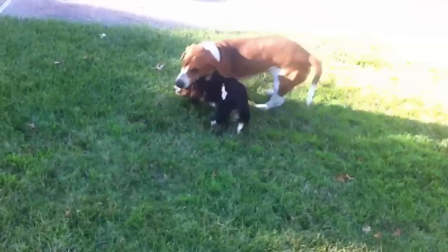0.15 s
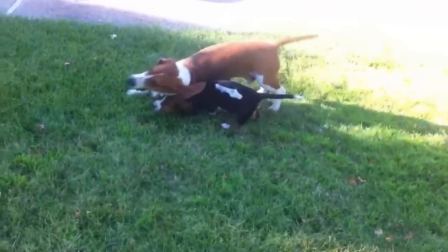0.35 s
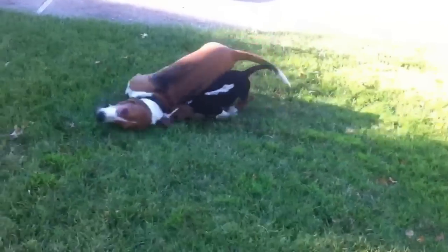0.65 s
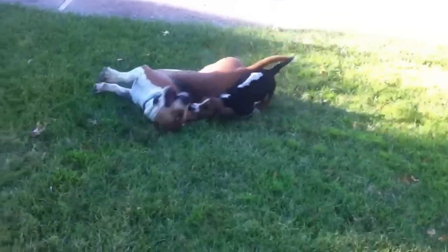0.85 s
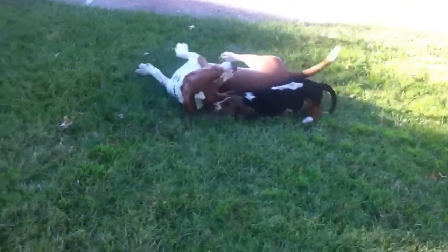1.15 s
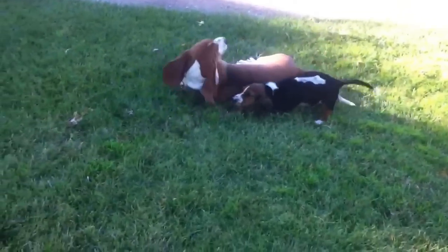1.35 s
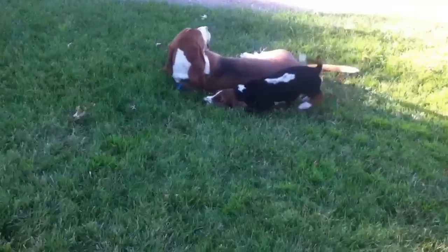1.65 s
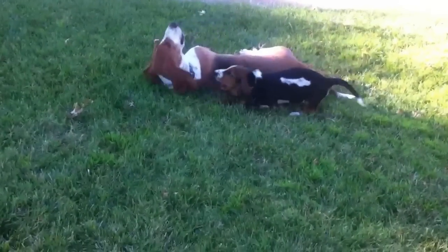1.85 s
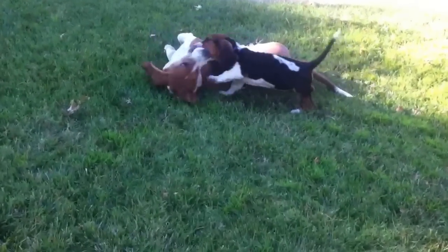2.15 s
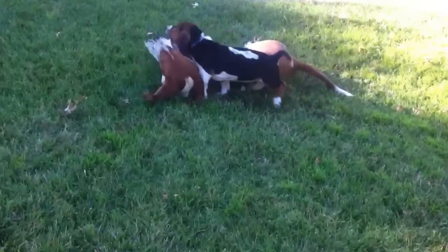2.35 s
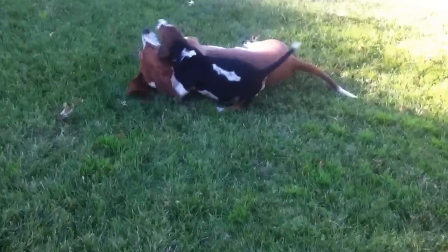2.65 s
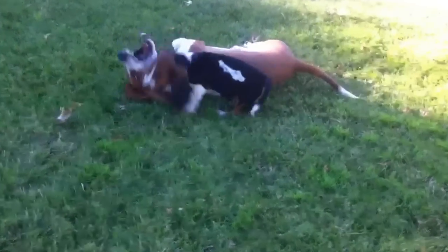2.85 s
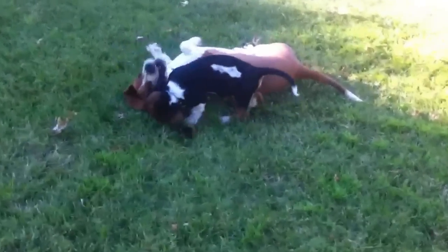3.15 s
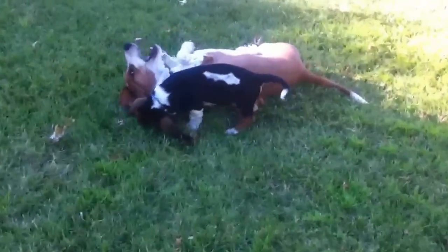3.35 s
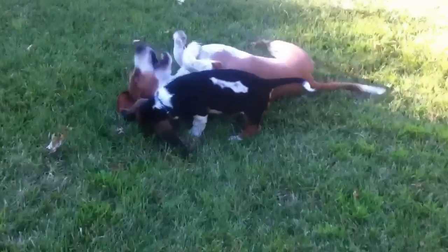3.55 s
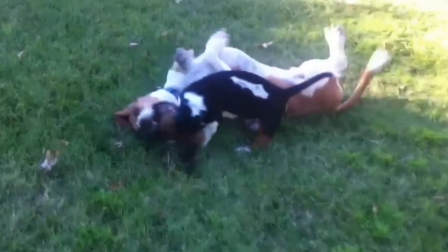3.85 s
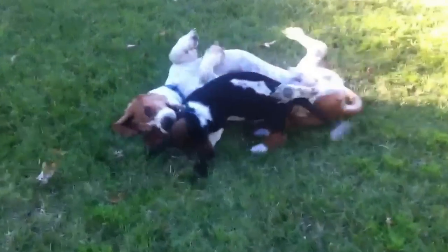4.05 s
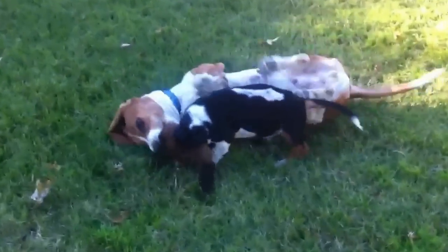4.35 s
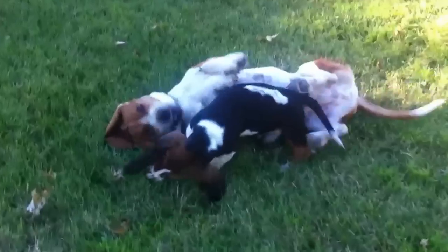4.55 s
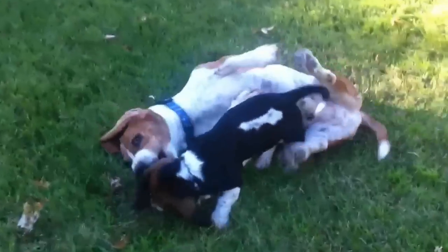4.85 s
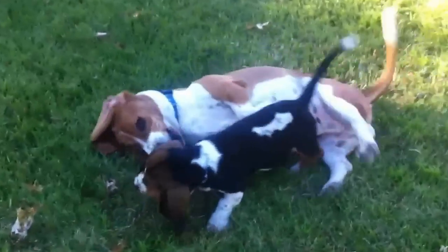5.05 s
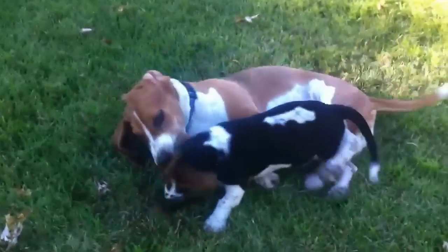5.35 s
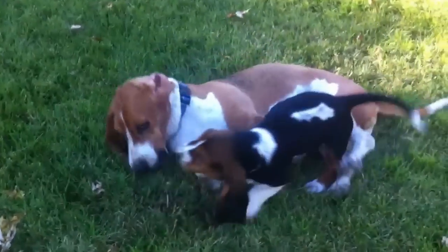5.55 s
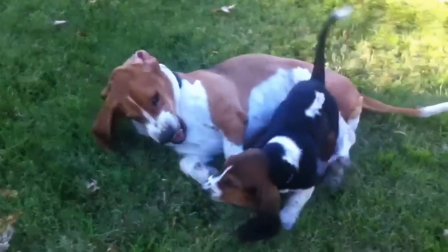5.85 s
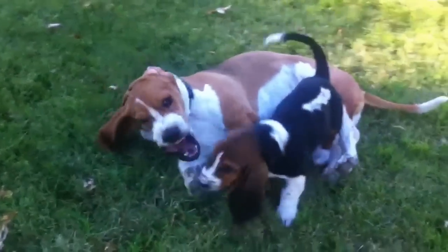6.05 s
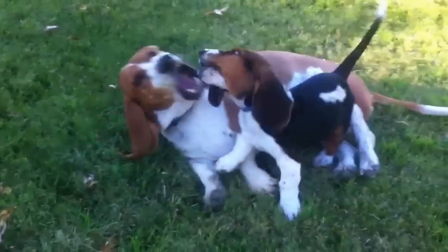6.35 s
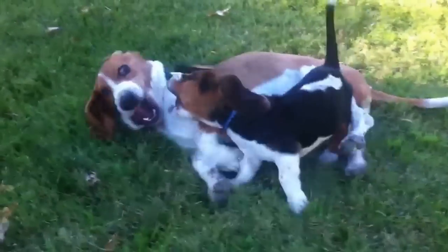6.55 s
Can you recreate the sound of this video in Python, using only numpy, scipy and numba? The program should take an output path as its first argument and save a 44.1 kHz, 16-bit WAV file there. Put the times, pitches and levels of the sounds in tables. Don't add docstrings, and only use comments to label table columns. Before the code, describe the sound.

Low raspy puppy growls come in quick clusters amid grass rubbing, teeth clacks, small crackles, soft huffs and faint outdoor air.

```python
import sys
import numpy as np
from scipy import signal
from scipy.fft import rfft, irfft
from scipy.io import wavfile
from scipy.ndimage import uniform_filter1d
from numba import njit

SR = 44100
rng = np.random.default_rng(int(sys.argv[2]) if len(sys.argv) > 2 else 0)


def amplitude_ratio(level_db):
    exponent = np.asarray(level_db, float) / 20
    return 10 ** exponent


def wrap_up_sound(samples):
    columns = np.atleast_2d(samples).T
    tamed = np.clip(columns, -1, 1)
    steps = np.round(tamed * 32767).astype(np.int16)
    wavfile.write(sys.argv[1], SR, steps)


N = 295029

# f/Hz, level per Hz/dB
AIR_COLOUR = [(15, -24), (25, 17), (49, -2.5), (126, 4.5), (194, 6.5), (402, -3.5), (788, -1.5),
              (2080, -15.5), (3120, -14), (4000, -18.5), (4900, -8.5), (5790, -10.5), (7180, -17),
              (9410, -6.5), (11700, -20.5), (14100, -17.5), (15700, -43)]
# t/s, peak level/dB, f/Hz, time to fall 60 dB/s
THUDS = [(0.545, -51, 149, 0.12), (2.419, -43.5, 118, 0.051), (3.245, -40, 117, 0.14),
         (3.746, -51, 111, 0.14), (3.781, -49, 150, 0.29), (3.822, -42, 140, 0.089),
         (3.86, -39, 142, 0.081), (3.989, -51, 102, 0.12), (4.389, -43, 120, 0.038),
         (5.159, -51.5, 112, 0.12), (5.857, -59, 126, 0.12)]
# centre t/s, spread/s, blade hiss level/dB, fur drag over hiss/dB
ROLLS = [(0.0, 0.0071, -46, 5.5), (.17, 0.15, -59.5, 8), (.285, 0.036, -51, -14), (.565, 0.21, -55.5, 0.5),
         (.9, 0.095, -58, 5.5), (1.2, 0.16, -63, 5), (1.46, 0.17, -61.5, 3.5), (1.69, 0.045, -63, -24),
         (1.9, 0.27, -64.5, 4), (2.41, 0.16, -59, 9), (2.68, 0.2, -60.5, -7), (2.871, 0.056, -57, 7),
         (3.03, 0.1, -54, 2.5), (3.25, 0.06, -58, -0.5), (3.48, 0.1, -63.5, 7), (3.72, 0.067, -63, -17),
         (3.91, 0.14, -52.5, 5), (4.09, 0.12, -57.5, 1.5), (4.34, 0.047, -56, -1.5),
         (4.519, 0.028, -54.5, 4), (4.65, 0.098, -52.5, 6.5), (4.88, 0.12, -52.5, 2.5),
         (5.16, 0.057, -55, 2.5), (5.28, 0.061, -51.5, 3.5), (5.639, 0.34, -53.5, 3),
         (5.853, 0.086, -51.5, 0), (6.211, 0.078, -49, 4.5), (6.42, 0.11, -49, -2), (6.56, 0.21, -65.5, 15),
         (6.69, 0.12, -50.5, 1.5)]
# f/Hz, level per Hz/dB
GRASS_COLOUR = [(1530, 4), (2600, -12.5), (3210, 1), (3540, 3.5), (3990, 2.5), (5430, 1), (6220, 3),
                (7250, -2), (8100, -1), (9340, 4.5), (10600, 1.5), (11700, -1), (13000, 1.5), (14900, -1),
                (15700, -36)]
# t/s, peak level/dB, ring f/Hz, low part over peak/dB
SNAPS = [(0.0353, -29.5, 9800, -17), (0.066, -26.5, 11000, -22), (0.6968, -40, 10300, -13),
         (0.8741, -31.5, 9000, -8.5), (1.5363, -40, 5000, -19), (1.803, -30.5, 9800, -16),
         (2.9615, -39, 9500, 0), (2.9774, -37, 12500, -15), (2.9972, -24.5, 12600, -38),
         (3.016, -35, 9610, -27), (3.036, -30, 9900, -33), (3.08, -39, 9780, -25),
         (3.4865, -39.5, 12000, -9), (3.5578, -32.5, 10200, -47), (3.584, -37, 12100, -18),
         (3.61, -36.5, 8740, -4), (3.6763, -35, 10700, -10), (3.7454, -47, 9700, -12),
         (3.7682, -27.5, 13800, -11.5), (4.0087, -35.5, 6740, -15), (4.5156, -43, 4200, -9),
         (4.526, -35, 3380, 2), (4.547, -43, 3600, -10), (4.578, -48, 3980, -9), (5.126, -42, 9300, -18),
         (5.921, -32.5, 11100, -28), (5.9498, -33, 14700, -22), (5.97, -36, 14200, -27),
         (6.094, -39.5, 7520, -11), (6.0977, -36, 14200, -22), (6.2492, -30, 12700, -14),
         (6.3455, -32, 9210, -1), (6.4726, -40, 12900, -19), (6.586, -31, 5500, -4)]
# t/s, peak level/dB
PINGS = [
    (0.3174, -49),
    (0.6978, -59),
    (1.6736, -61),
    (1.804, -30.5),
]
# f/Hz, level/dB, time to fall 60 dB/s
TAG_MODES = [
    (8980, -11, 0.075),
    (10200, 4.5, 0.092),
    (11700, -24, 0.064),
    (15100, -23, 0.099),
]
# t/s, peak level/dB, mouth f/Hz, time to fall 60 dB/s, share of bare tooth knock/1
CLACKS = [(0.062, -40, 1600, .01, 0.65), (0.004, -24, 1070, 0.021, 0.16), (0.419, -48, 640, 0.07, 0.27),
          (.329, -43, 2220, 0.011, 0.23), (.425, -41, 2170, .012, 0.17), (0.9245, -26.5, 630, 0.022, 0.52),
          (1.199, -46, 1376, 0.12, 0.46), (3.367, -38, 950, 0.02, 0.51), (3.957, -36.5, 1926, 0.082, 0.31),
          (3.989, -38, 1810, 0.026, 0.65), (4.108, -29.5, 1056, 0.023, 0.74),
          (5.357, -42, 1500, 0.019, 0.78), (6.003, -40.5, 660, 0.0091, 0.28),
          (6.086, -41.5, 965, 0.05, 0.75), (6.494, -38.5, 830, 0.066, 0.35),
          (6.523, -31.5, 916, 0.034, 0.12), (6.532, -33, 900, 0.036, .1), (6.585, -24, 1000, 0.025, 0.11),
          (6.621, -26, 1150, 0.026, 0.093), (6.631, -25, 1100, 0.019, 0.37),
          (6.684, -33, 1000, 0.024, 0.24)]
# t/s, length/s, level/dB, snout f/Hz
HUFFS = [
    (.272, .046, -52, 800),
    (.465, 0.087, -60, 680),
    (1.16, 0.024, -52.5, 815),
    (5.585, 0.067, -51, 520),
    (5.64, 0.059, -48.5, 580),
]
# t/s, length/s, level/dB, nostril f/Hz
SNIFFS = [
    (.255, 0.065, -59.5, 5150),
    (1.968, 0.067, -63.5, 5260),
    (2.198, 0.031, -56.5, 5000),
    (2.54, 0.058, -63.5, 5370),
    (5.44, 0.045, -58, 5340),
]
# t/s, length/s,
# level/dB, ringing f/Hz
PANTS = [(5.445, 0.04, -65, 2060), (6.5, .06, -63, 3300), (5.79, 0.1, -68, 1720), (2.2, 0.054, -72, 1900),
         (4.19, 0.027, -61.5, 270), (1.96, 0.074, -66, 2420), (1.3, 0.06, -67, 2150),
         (4.955, 0.058, -58, 1360), (5.6, 0.13, -62.5, 1880), (2.9, 0.039, -53, 1150),
         (5.07, 0.1, -60.5, 1220), (5.19, 0.11, -57, 1900), (4.6, 0.071, -60, 1240)]
# t/s, length/s, chest level/dB, rise in effort from middle to end/dB
GROWLS = [(0.0, 0.031, -48.5, -1.5), (0.062, 0.048, -48.5, 3.5), (0.119, 0.18, -55, -3),
          (0.284, 0.12, -50, 1.5), (.670, 0.11, -48.5, 3), (0.798, 0.13, -49, -0.5),
          (0.934, 0.067, -50.5, 6), (1.403, 0.13, -51.5, 2.5), (1.528, 0.043, -62.5, 5),
          (1.961, 0.072, -47.5, 9), (2.05, 0.19, -59.5, -5), (2.233, 0.066, -57, 1.5),
          (2.315, 0.1, -51, 6.5), (2.429, 0.065, -52.5, -3), (2.914, 0.058, -53.5, 5),
          (2.975, 0.049, -48, 3.5), (3.051, 0.133, -51.5, -1.5), (3.199, 0.165, -49.5, 5),
          (3.371, 0.15, -50, -2.5), (4.509, 0.11, -47.5, 7.5), (4.633, 0.062, -47.5, -0.5),
          (4.705, 0.089, -44, -0.5), (4.804, 0.024, -45.5, -2.5), (4.841, 0.14, -45, 0.5),
          (4.986, 0.042, -65.5, -1), (5.454, 0.045, -43, -1), (5.516, 0.053, -51, -4),
          (6.457, 0.14, -50, 8), (6.581, 0.061, -47.5, 6.5), (6.647, .05, -49, 2)]
SLAP_RATES = [66, 93, 80, 89.5, 90.5, 86, 77, 71.5, 72, 81, 67, 65, 76, 83, 80, 79, 77, 74, 85, 72, 81, 84,
              79, 84, 90, 88, 82, 80, 80, 81]
# mouth f at start/Hz, at end/Hz, mouth over chest/dB, mouth width/Hz
JAWS = [(1100, 490, -3.5, 210), (1510, 1300, -8.5, 330), (1600, 1000, -8.5, 350), (838, 680, 0.5, 110),
        (790, 700, 7.5, 420), (825, 420, 2.5, 350), (760, 560, -5.5, 710), (950, 750, -4.5, 130),
        (775, 610, 10.5, 140), (990, 940, -1.5, 160), (950, 1300, -6, 190), (1320, 1700, -1.5, 160),
        (786, 500, 2.5, 240), (950, 1570, 2, 240), (1150, 1600, -6, 220), (1180, 1200, -5, 100),
        (1060, 1060, -10, 160), (930, 370, -16, 510), (1140, 1200, -1.5, 160), (1000, 810, -35, 250),
        (1160, 1130, -7, 230), (1160, 1100, -8, 120), (1150, 1200, -4, 140), (1110, 700, 1, 234),
        (1600, 780, 14.5, 270), (950, 1340, -10, 200), (1190, 1400, -4.5, 100), (840, 1300, -20, 300),
        (990, 990, -2, 250), (1030, 610, -13, 230)]
# roughness/1, throat f/Hz, throat over chest/dB, nose over chest/dB
THROATS = [(0.34, 560, -25, -14), (0.42, 565, -8, -12), (0.45, 584, -6, -2), (0.19, 635, -7.5, -19),
           (0.25, 740, -13, 4), (0.3, 640, -5, -10), (0.36, 620, -6, 5), (0.29, 630, -5, -3),
           (0.43, 600, -16, -2), (0.24, 630, -3, -18), (0.22, 536, -8.5, -23), (0.37, 730, -3, 8),
           (0.26, 520, -13, -9), (0.28, 670, 1.5, -12), (0.31, 680, -6, 6), (0.19, 570, -10, -6),
           (0.16, 670, -15, -25), (.29, 330, -16, -3), (0.33, 753, -5.5, 6.5), (0.33, 760, -40, -25),
           (0.2, 690, -10, 1), (.27, 744, -11.5, 4.5), (0.07, 700, -9, -15), (0.2, 715, -5.5, 9),
           (0.5, 620, 0, 6), (.26, 480, -12, -13), (0.27, 470, -13, -20), (0.35, 420, -8, -14),
           (0.31, 414, -3.5, 11), (0.35, 444, -6, -22)]
# mid-cycle slap share/1, nose f/Hz, chest f/Hz
VOICES = [(0.8, 2400, 244), (0.39, 2370, 250), (0.7, 2630, 224), (0.16, 2200, 226), (0.35, 2200, 228),
          (0.65, 2660, 222), (1, 2380, 220), (0.16, 2300, 178), (0.77, 2700, 170), (0.25, 2400, 188),
          (0.2, 2160, 200), (0.17, 2100, 214), (0.28, 2000, 185), (0.42, 2200, 210), (0.48, 1800, 194),
          (0.33, 1500, 160), (0.52, 2100, 202), (0.97, 1750, 190), (0.43, 2110, 193), (0.15, 1930, 158),
          (0.21, 2100, 217), (0.34, 2220, 176), (0.27, 2600, 200), (0.3, 1490, 205), (0.71, 2200, 180),
          (0.33, 2250, 198), (0.21, 2300, 190), (0.69, 2000, 140), (0.51, 2190, 163), (0.61, 2400, 150)]
# t/s, gain/dB
LIP_MOVES = [(.064, -2), (.085, 4.5), (.094, 14), (.11, -12), (.143, 15.5), (.17, 12), (.213, 9), (.236, 6),
             (.262, 2), (.29, -11), (.678, -3), (.733, 2), (.773, -4), (.785, -2), (.815, 4), (.868, -8),
             (.918, 3.5), (1.43, 5), (1.506, 3.5), (1.964, -5), (1.985, 4.5), (2.015, 1), (2.24, 7),
             (2.36, 4), (2.445, 0), (2.481, 4), (3.005, 8), (3.15, 11), (3.172, 8), (3.265, 0), (.333, 4.5),
             (1.465, 4), (3.374, 6.5), (3.415, 2), (3.472, -3), (3.455, 4), (4.635, 5), (4.65, -5),
             (4.741, 10.5), (4.757, -2), (4.862, 5), (4.88, -7), (4.892, 4), (4.927, -3), (4.942, 6.5),
             (4.964, -5), (4.976, 2), (4.845, -2.5), (5.525, -5), (5.56, 2), (5.585, 4), (2.41, -4)]

GROWL_RELEASE_S = 0.014
MUFFLE_DB = 4


@njit
def svf(x, hz, width):
    y, b, l = np.empty(len(x)), 0., 0.
    for i in range(len(x)):
        g, k = np.tan(np.pi * hz[i] / SR), width[i] / hz[i]
        v = (b + g * (x[i] - l)) / (1 + g * (g + k))
        b, l, y[i] = 2 * v - b, l + 2 * g * v, k * v
    return y


def unit(x):
    return x / np.sqrt(np.mean(x ** 2))


def band(x, hz, width_hz, order=2):
    hz = np.clip(hz, 40, .45 * SR) + np.zeros(len(x))
    width = width_hz + np.zeros(len(x))
    for _ in range(order):
        x = svf(x, hz, width)
    return unit(x)


def smooth_filter(x, order, hz, kind="low"):
    return signal.sosfiltfilt(signal.butter(order, hz, kind, fs=SR, output="sos"), x)


def colour(x, spectrum):
    hz, db = np.transpose(spectrum)
    bins = np.arange(len(x) // 2 + 1) * SR / len(x)
    bins = np.clip(bins, 1, hz[-2])
    gain = amplitude_ratio(np.interp(np.log(bins), np.log(hz), db))
    return unit(irfft(rfft(x) * gain, len(x)))


def walk(rate):
    k = int(SR / rate)
    steps = np.repeat(rng.standard_normal(N // k + 1), k)
    return 0.92 * uniform_filter1d(steps, k)[:N]


def swell(start, length, attack_s, release_s):
    first = int(start * SR)
    t = np.arange(min(int((length + 5 * release_s) * SR), N - first)) / SR
    head_start = attack_s * (start == 0)
    rise = np.minimum((t + head_start) / attack_s, 1)
    fall = np.exp(-np.maximum(t - length, 0) / release_s)
    return slice(first, first + len(t)), rise * fall


def ring(hz, t60, rise_s):
    t = np.arange(int(min(t60, .3) * SR) + 8) / SR
    x = np.sin(2 * np.pi * hz * t) * (1 - np.exp(-t / rise_s)) * 1000. ** (-t / t60)
    return x / np.abs(x).max()


def add(out, s, x):
    i = max(int(s * SR), 0)
    out[i:i + len(x)] += x[:N - i]


def garden():
    air = colour(rng.standard_normal(N), AIR_COLOUR)
    traffic = smooth_filter(air, 2, 600)
    leaves = air - traffic
    traffic_gain = amplitude_ratio(1.6 * walk(6) + 0.5 * walk(20))
    leaves_gain = amplitude_ratio(0.74 * walk(3.47) + 2.0 * walk(19))
    return amplitude_ratio(-60) * (traffic * traffic_gain + leaves * leaves_gain)


def thuds():
    out = np.zeros(N)
    for s, db, hz, t60 in THUDS:
        add(out, s, amplitude_ratio(db) * ring(hz, t60, rise_s=0.0036))
    return out


def rolls():
    centre, spread, db, fur_db = np.transpose(ROLLS)[:, :, None]
    t = np.arange(0, N + 64, 64) / SR
    hiss_db = db - 6 * np.abs((t - centre) / spread) ** 1.42
    scrape_db = hiss_db - 6 + 0.65 * fur_db
    drag_db = hiss_db + fur_db - 10.0
    gains = []
    for layer_db in (hiss_db, scrape_db, drag_db):
        total = np.sqrt(np.sum(amplitude_ratio(layer_db) ** 2, axis=0))
        gains.append(np.interp(np.arange(N) / SR, t, total))
    return gains


def crackle(per_s, spread_db, bed):
    size = amplitude_ratio(spread_db * np.minimum(rng.exponential(size=N), 3))
    ticks = (rng.random(N) < per_s / SR) * size * rng.standard_normal(N)
    return unit(ticks) + bed * rng.standard_normal(N)


def lawn():
    hiss_gain, scrape_gain, drag_gain = rolls()
    ticks = crackle(per_s=1500., spread_db=4.0, bed=2.05)
    ticks = ticks * amplitude_ratio(2.1 * walk(45) + .6 * walk(14))
    grass = colour(ticks, GRASS_COLOUR)
    stalks = smooth_filter(grass, 4, 7500)
    blades = grass - stalks
    upper_shift, lower_shift = 1 + .07 * walk(14), 1 + .12 * walk(10)
    upper_fur = band(ticks, 1950 * upper_shift, 1160)
    lower_fur = band(ticks, 1200 * lower_shift, 1250)
    fur = unit(upper_fur + .5 * lower_fur)
    fur = fur + 0.067 * band(ticks, 590, 1300)
    return hiss_gain * unit(blades) + scrape_gain * unit(stalks) + drag_gain * fur


def snaps():
    out = np.zeros(N)
    for s, db, hz, low_db in SNAPS:
        burst = rng.standard_normal(128) * np.exp(-np.arange(128) / 33.0)
        bright = band(burst, hz, hz ** 2 / 11000, order=1)
        crack = bright + amplitude_ratio(low_db) * band(burst, 2270, 2100)
        add(out, s, amplitude_ratio(db) * crack / np.abs(crack).max())
    return out


def tag_pings():
    out = np.zeros(N)
    for s, db in PINGS:
        for hz, mode_db, t60 in TAG_MODES:
            add(out, s, amplitude_ratio(db + mode_db) * ring(hz, t60, rise_s=0.00045))
            add(out, s, amplitude_ratio(db + mode_db - 18.0) * ring(hz + 135.0, t60, rise_s=.0002))
    return out


def clacks():
    out = np.zeros(N)
    for s, db, hz, t60, tooth in CLACKS:
        rise_s = 0.00021 + 0.0021 * max(1 - 2 * tooth, 0)
        add(out, s, amplitude_ratio(db - 8.5) * ring(hz, t60, rise_s))
        burst = rng.standard_normal(400) * np.exp(-np.arange(400) / 60.)
        knock = band(burst, 1210, 1360, order=3)
        add(out, s, amplitude_ratio(db) * tooth * knock / np.abs(knock).max())
    return out


def breath(calls, width_hz, flutter_db):
    out = np.zeros(N)
    air = rng.standard_normal(N) * amplitude_ratio(flutter_db * walk(70))
    for start, length, db, hz in calls:
        span, shape = swell(start, length, attack_s=.04, release_s=.025)
        snout = band(air[span], hz, width_hz, order=3)
        snout = snout + .5 * band(air[span], 1.246 * hz, width_hz, order=3)
        out[span] += amplitude_ratio(db) * shape * snout
    return out


def older_dog():
    out = breath(HUFFS, width_hz=330, flutter_db=2.0)
    out = out + breath(SNIFFS, width_hz=1900, flutter_db=4.0)
    return out + breath(PANTS, width_hz=380, flutter_db=3.0)


def lips():
    s, db = np.transpose(LIP_MOVES)[:, :, None]
    t = np.arange(0, N + 64, 64) / SR
    gain_db = np.sum(db * np.exp(-.5 * ((t - s) / .006) ** 2), axis=0)
    return amplitude_ratio(np.interp(np.arange(N) / SR, t, gain_db))


def folds(rate, rough, half):
    chance = np.clip(rng.standard_normal((200, 4)), -1.8, 1.8)
    air = rng.standard_normal(SR // 2)[:len(rate)]
    turns = np.cumsum(rate) / SR
    cycle = np.arange(len(chance))
    slaps = np.zeros(len(rate))
    for offset, size, when, loud in ((.1, 1, 0, 1), (.6, -half, 2, 3)):
        time_spread = (.15 + .5 * (offset - .1)) * rough
        loud_spread_db = (6 + 14 * (offset - .1)) * rough
        at = cycle + offset + time_spread * chance[:, when]
        keep = (at > 0) & (at < turns[-1])
        slaps[np.searchsorted(turns, at[keep])] += size * amplitude_ratio(loud_spread_db * chance[keep, loud])
    leak = air * np.exp(-((turns - .1) % 1) / .4)
    leak = .6 * rough * unit(leak)
    thumps = unit(np.abs(slaps) ** .7) + leak
    return unit(slaps) + .4 * leak, thumps


def mouth_ring(slaps, first_hz, pitch_hz, width_hz):
    soft = signal.sosfilt(signal.butter(4, 2500, fs=SR, output="sos"), slaps)
    mouth = band(soft, pitch_hz, 1.3 * width_hz)
    front = band(soft, first_hz, 1130, order=3)
    teeth = band(slaps, 2320, 300, order=3)
    return mouth + amplitude_ratio(-12.5) * front + amplitude_ratio(-26) * teeth


def puppy():
    chest, head = np.zeros(N), np.zeros(N)
    wavering, muffling = 1 + .055 * walk(80), walk(28)
    for growl, rate, jaw, throat, voice in zip(GROWLS, SLAP_RATES, JAWS, THROATS, VOICES):
        start, length, middle_db, rise_db = growl
        first_hz, last_hz, mouth_db, width_hz = jaw
        rough, throat_hz, throat_db, nose_db = throat
        half, nose_hz, chest_hz = voice
        span, chest_shape = swell(start, length, 0.0049, GROWL_RELEASE_S)
        head_shape = swell(start, length, .002, GROWL_RELEASE_S)[1]
        after_end = np.maximum(np.arange(len(head_shape)) / SR - length, 0)
        head_shape = head_shape * np.exp(-after_end / 0.018)

        along, waver = np.linspace(-1, 1, len(chest_shape)), wavering[span]
        effort = amplitude_ratio(middle_db + rise_db * along)
        slaps, thumps = folds(rate * (1 + 0.01 * along), rough, half)
        mouth_hz = np.linspace(first_hz, last_hz, len(along)) * waver
        nose = band(slaps, nose_hz / waver, 430, order=3)
        mouth = mouth_ring(slaps, first_hz, mouth_hz, width_hz)
        body = band(thumps, chest_hz * waver, 153)
        body = body - amplitude_ratio(throat_db) * band(thumps, throat_hz, 196)

        swing_db = MUFFLE_DB * rough * muffling[span]
        chest[span] += effort * amplitude_ratio(swing_db[::-1]) * chest_shape * body
        face = amplitude_ratio(nose_db - 17.0) * nose + amplitude_ratio(mouth_db) * mouth
        head[span] += effort * amplitude_ratio(swing_db) * head_shape * face
    parting = lips()
    chest = chest * parting ** 0.28
    head = smooth_filter(head * parting, 2, 480., "high")
    return head + signal.sosfilt(signal.butter(4, 125., "high", fs=SR, output="sos"), chest)


def scene():
    dogs = puppy() + older_dog()
    dogs = dogs + .12 * np.roll(dogs, int(.0031 * SR))
    mono = dogs + lawn() + garden() + snaps() + tag_pings() + clacks() + thuds()
    return np.array([mono, mono])


def low_pass(x):
    return signal.sosfilt(signal.butter(12, 16640, fs=SR, output="sos"), x)


def record(dry):
    thin = signal.sosfilt(signal.butter(2, 90., "high", fs=SR, output="sos"), dry)
    thin = signal.sosfilt(signal.ellip(9, .3, 34, 15800, fs=SR, output="sos"), thin)
    return low_pass(thin)


dry = scene()
out = record(dry)
wrap_up_sound(out)
```